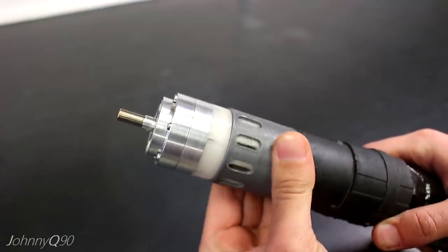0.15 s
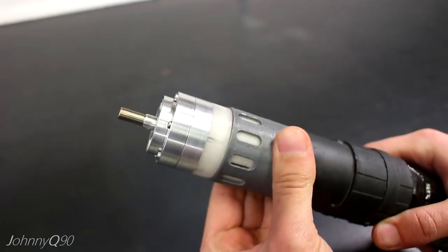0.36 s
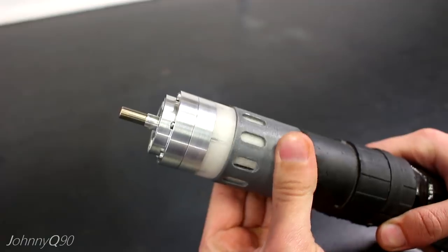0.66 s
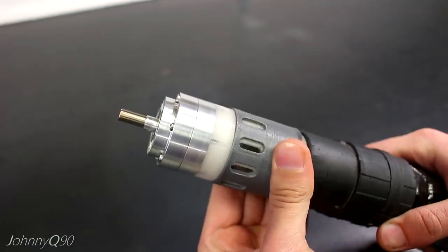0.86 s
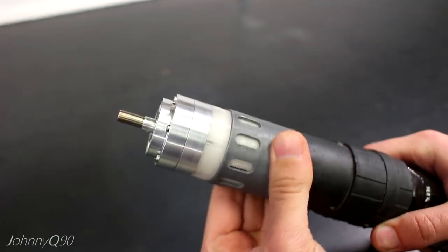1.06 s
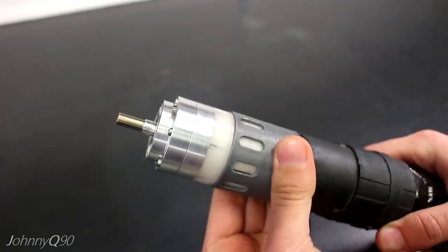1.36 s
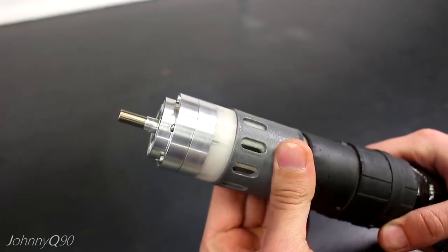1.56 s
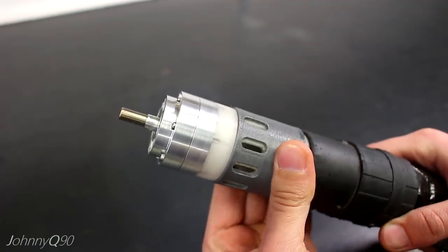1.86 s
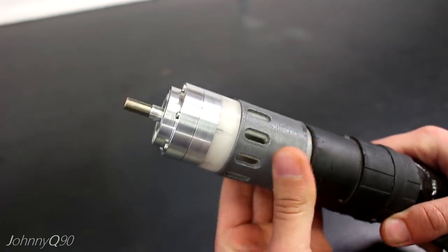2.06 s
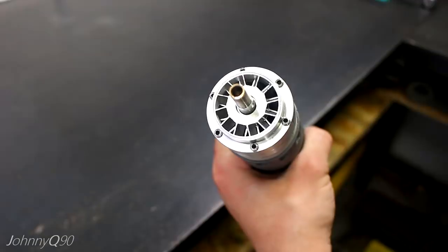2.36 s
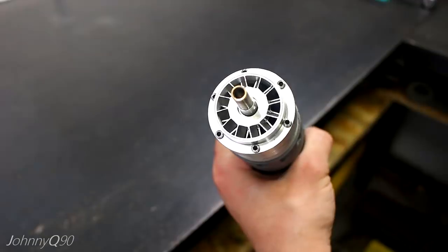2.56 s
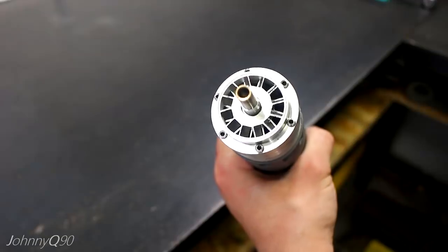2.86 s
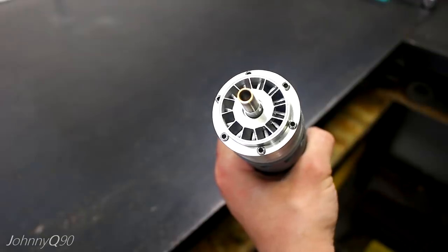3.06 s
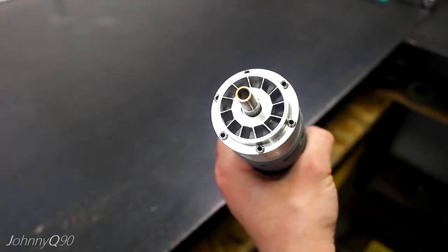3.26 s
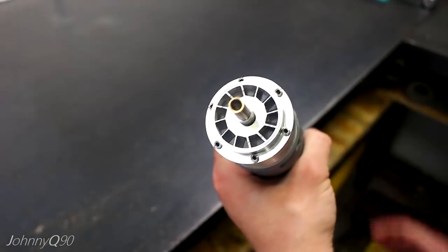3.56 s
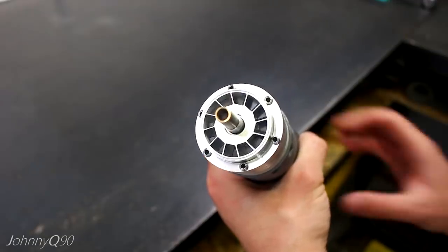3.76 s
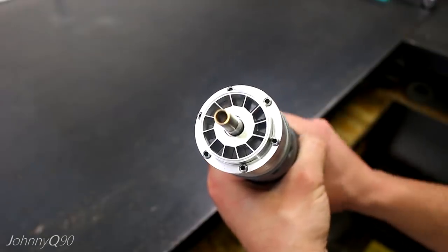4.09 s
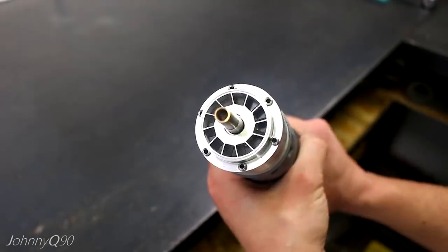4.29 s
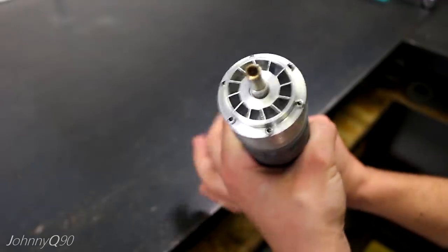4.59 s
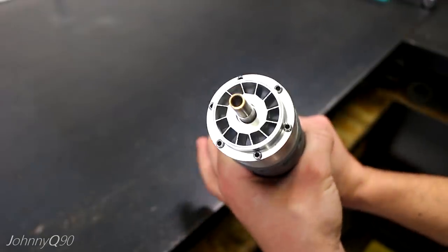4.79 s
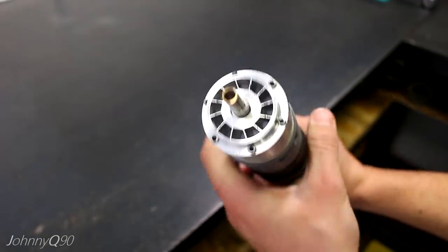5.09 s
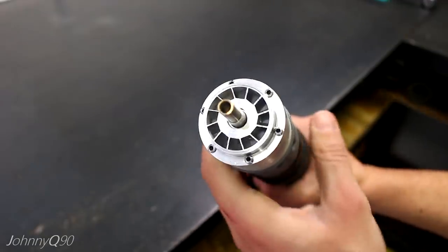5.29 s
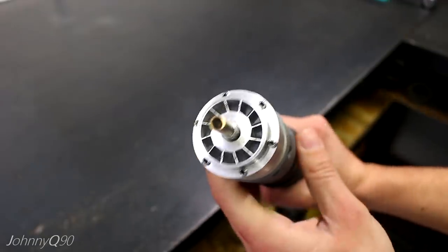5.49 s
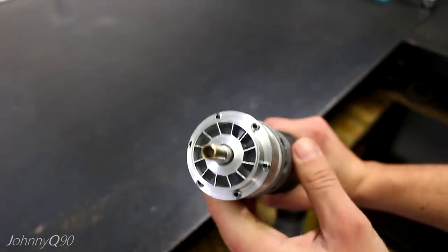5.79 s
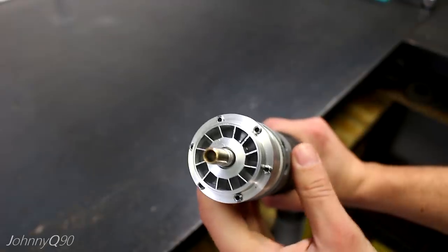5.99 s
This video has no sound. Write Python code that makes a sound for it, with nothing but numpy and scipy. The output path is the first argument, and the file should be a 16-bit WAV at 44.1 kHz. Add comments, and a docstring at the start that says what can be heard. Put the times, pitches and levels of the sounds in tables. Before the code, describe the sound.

Two shrill turbine swells with roaring vent air, an abrupt hush, one plastic click, then a vacuum motor winding up to a steady drone.

```python
"""Air turbine on a vacuum hose

A hand-held turbine: a thumb turns the vent ring and the rotor whines up and down twice, as blade-pass tones,
while noise peaked at the vent resonance roars over the drone of the running vacuum. A hard cut to the quiet
workshop: filtered impulses click a switch, and the vacuum's fan motor runs up to its steady drone, with tones
locked to its shaft over resonant air noise. One microphone."""
import sys
import numpy as np
from scipy import signal
from scipy.fft import rfft, irfft, next_fast_len
from scipy.io import wavfile
from scipy.ndimage import uniform_filter1d, map_coordinates

SR = 44100
rng = np.random.default_rng(int(sys.argv[2]) if len(sys.argv) > 2 else 0)


def waveform_to_disk(signal):
    """Save audio, clipped to [-1, 1], as 16-bit WAV at the path in sys.argv[1]."""
    frames = np.transpose(np.atleast_2d(signal))
    scaled = np.clip(frames, -1, 1) * 32767
    samples = np.round(scaled).astype(np.int16)
    wavfile.write(sys.argv[1], SR, samples)


def linear_from_db(decibels):
    """Turn decibels (scalar or array-like) into linear amplitude factors; 0 gives 1."""
    return 10 ** (np.asarray(decibels, float) / 20)


N = 270774
TIME = np.arange(N) / SR
CUT_S = 2.389  # hard cut from the turbine to the workshop


def unit(x):
    """Scaled to rms 1."""
    return x / np.sqrt(np.mean(x ** 2) + 1e-20)


def along(points, hz):
    """Reads (frequency [Hz], value) points on a log frequency axis."""
    point_hz, value = np.transpose(points)
    return np.interp(np.log(hz + 1), np.log(point_hz + 1), value)


def curves(rows):
    """One value per sample for each column after the time."""
    s, *columns = np.transpose(rows)
    return [np.interp(TIME, s, column) for column in columns]


def wobble(rate):
    """A smooth random curve, rate knots a second."""
    knots = rng.standard_normal(int(N * rate / SR) + 4)
    return map_coordinates(knots, [TIME * rate])


def filtered(x, response):
    """x times a complex response of frequency."""
    size = next_fast_len(N + SR // 2)
    hz = np.fft.rfftfreq(size, 1 / SR)
    return irfft(rfft(x, size) * response(hz), size)[:N]


def modes(rows):
    """Causal response of resonances, listed as (frequency [Hz], width [Hz], level [dB]), alternating in sign."""
    def response(hz):
        total = 0
        for k, (centre, width, db) in enumerate(rows):
            damping = 1j * hz * width
            total = total + (-1) ** k * linear_from_db(db) * damping / (centre * centre - hz * hz + damping)
        return total
    return response


def rush(gain, patchy_db):
    """Rms-1 noise with patches of random gain, coloured by gain(hz, s) of frequency and time."""
    hz, s, z = signal.stft(rng.standard_normal(N), SR, nperseg=512)
    patches = uniform_filter1d(rng.standard_normal(z.shape), size=5, axis=0)
    patches = uniform_filter1d(patches, size=2, axis=1)
    z = z * linear_from_db(patchy_db * unit(patches)) * gain(hz[:, None], s)
    return unit(signal.istft(z, nperseg=512)[1][:N])


def tone(turns, rough, rate):
    """A sine of rms 1 whose size and phase are shaken by turbulence."""
    shake = 1 + rough * (wobble(rate) + 1j * wobble(rate))
    return unit((shake * np.exp(2j * np.pi * turns)).real)


# the rotor's glides, before inertia and body: (time [s], blade-pass frequency [Hz], whine level [dB])
ROTOR_GLIDES = [(.1, 180.2, -33.5), (.2, 440, -35), (.28, 854, -40.5), (.33, 1300, -41), (.38, 1733, -40.5),
                (0.421, 2050, -31.5), (.46, 2300, -30.5), (.5, 2485, -31), (.545, 2620, -29),
                (.62, 2995, -28), (.7, 3254, -25.5), (.75, 3403, -28), (0.781, 3307, -30),
                (.82, 3010, -35.5), (.87, 2553, -32.5), (.93, 1952, -38), (1, 1508, -33.5),
                (1.08, 1254, -39.5), (1.139, 1481, -37), (1.23, 2360, -32), (1.28, 2602, -29.5),
                (1.42, 2596, -28.5), (1.46, 2900, -27), (1.505, 2950, -25.5), (1.57, 2640, -29),
                (1.63, 2218, -26.5), (1.69, 1863, -31), (1.77, 1605, -30), (1.9, 1246, -37),
                (2.1, 850, -49)]
# blade-pass multiples 1 to 4: (offset from the whine level [dB])
WHINE_MULTIPLES = [0.5, -4.5, -11.5, -12.5]
# the whine's overtones over their usual level: (time [s], level [dB])
OVERTONE_SWELLS = [(.2, 4), (.33, 5.5), (.38, 7.5), (.42, -0.5), (.46, -1), (.6, 1.5), (.74, -1),
                   (.82, 1.5), (.88, -9), (1.0, -5), (1.1, -1), (1.2, 1.5), (1.36, 0.5), (1.5, -2.5),
                   (1.56, -10), (1.63, -11), (1.7, -8), (1.8, -8), (1.9, -3.5)]
# how well the tool body radiates each pitch: (frequency [Hz], level [dB])
TOOL_BODY = [(200, -19), (900, -21), (1350, -8.5), (1780, -13), (2030, -6), (2300, 1.5), (3100, -3.5),
             (3270, 7), (3400, 3.5), (3600, 4), (4100, -1.5), (4600, 6.5), (5100, -0.5), (5850, 1.5),
             (6700, -6.5), (7800, -2.5), (9000, -3), (10400, -6), (13500, -12)]
# unequal blades put side tones at whole shaft orders:
# (blade-pass multiple [count], offset [shaft orders], level relative to the multiple [dB])
SIDE_TONES = [(1, -1, -22), (1, 1, -21), (2, -1, -15), (2, 1, -17), (2, 2, -26), (3, -2, -11), (3, -1, -6),
              (3, 1, -10), (4, -2, -8), (4, 1, -12), (4, 4, -12), (4, 9, -10), (4, 12, -8)]


def rotor():
    """Blades chop the air into a whine with shaft-order side tones; its echo trails behind every glide."""
    blades = 12
    blade_hz, whine_db = curves(ROTOR_GLIDES)
    blade_hz = uniform_filter1d(blade_hz, size=1500)  # the rotor's inertia rounds every change of speed
    blade_hz = blade_hz * (1 + .002 * wobble(18))  # the speed wavers slightly
    shaft_turns = np.cumsum(blade_hz) / (SR * blades)
    overtone_db, = curves(OVERTONE_SWELLS)

    level_db = []
    for k, db in enumerate(WHINE_MULTIPLES, 1):
        multiple_db = whine_db + db + along(TOOL_BODY, k * blade_hz)
        if k > 1:
            multiple_db = multiple_db + overtone_db + 1.3 * wobble(22)
        level_db.append(multiple_db)

    whine = np.zeros(N)
    for k, (db, rough) in enumerate(zip(level_db, [.07, .25, .35, .4]), 1):
        whine += linear_from_db(db + 0.59 * wobble(30)) * tone(k * blades * shaft_turns, rough, rate=110)
    for k, offset, db in SIDE_TONES:
        order = k * blades + offset
        audible = order * blade_hz / blades < SR / 2  # nothing above half the sample rate
        whine += audible * linear_from_db(level_db[k - 1] + db) * tone(order * shaft_turns, 0.57, rate=46)
    whine *= np.interp(TIME, [.1, .13, 2.0, 2.15], [0, 1, 1, 0])
    return whine + linear_from_db(-14) * workshop(whine, delay=.004)


# the thumb on the vent ring: (time [s], opening [0-1])
VENT_RING = [(.14, 1), (.26, 0.22), (.32, .04), (.38, 0.01), (.74, 0.01), (.8, 0.05), (.86, 0.3),
             (.98, .83), (1.05, 0.73), (1.1, .2), (1.16, 0), (1.22, 0.03), (1.46, 0.02), (1.54, 0.06),
             (1.64, 0.39), (1.78, 0.5), (1.95, 0.97), (2.4, 0.86)]


def vent_roar():
    """Air roars lumpily through the vent slots, peaked at their cavity resonance."""
    shut_hz, open_hz = 2500, 1745  # vent resonance
    open_db, leak_db = -34, -23.5  # open slots; leak through shut slots, relative to that
    full_at = .15  # scale of the opening at which the roar saturates
    air_on_s, air_rise_s, air_before_db = 0.095, 0.044, -13.5  # air starts through the tool
    opening = np.clip(curves(VENT_RING)[0], 0, 1)
    centre_hz = shut_hz + (open_hz - shut_hz) * opening

    def cavity(hz, s):
        centre = np.interp(s, TIME, centre_hz)
        u = (hz + 1) / centre
        resonance = u ** 0.23 / np.abs(1 - u * u + .55j * u) * np.minimum(u, 1) ** 0.96
        # closing slots raise the resonance and add a narrow whistle on top
        closing = np.clip(centre / 1850 - 1, 0, 1)
        whistle = 1.5 * closing / (0.33 + (hz / 2350 - 1) ** 2 / 0.0072)
        return (1 + whistle) * resonance

    start_db = air_before_db * np.clip(1 - (TIME - air_on_s) / air_rise_s, 0, 1)
    flow_db = 20 * np.log10(linear_from_db(leak_db) + np.tanh(opening / full_at))
    lumps_db = 0.85 * wobble(120) + 1.6 * wobble(17)
    return rush(cavity, patchy_db=-1.0) * linear_from_db(open_db + start_db + flow_db + lumps_db)


# colour of the blade-tip hiss, before speed brightens it: (frequency [Hz], relative density [dB])
HISS_COLOUR = [(1500, -32), (3000, -9.5), (5000, 4), (7000, -4.5), (9000, -2), (10500, -7.5),
               (13000, -11.5), (15700, -14)]


def blade_hiss():
    """Blade tips tear the air into hiss, brighter and louder with speed, weaker as open vents bypass them."""
    shut_db, open_loss_db = -40.5, -11.5  # slots shut; loss when the air bypasses the blades
    fade_s, fade_db_per_s = 2, -37  # the rotor coasts to rest
    opening = np.clip(curves(VENT_RING)[0], 0, 1)
    speed = curves(ROTOR_GLIDES)[0] / 2500

    def colour(hz, s):
        brightness = 0.39 * np.interp(s, TIME, speed)
        return linear_from_db(along(HISS_COLOUR, hz)) * (hz / 6000 + .2) ** brightness

    level_db = shut_db + open_loss_db * opening + fade_db_per_s * np.maximum(TIME - fade_s, 0)
    level_db = level_db + 0.15 * 20 * np.log10(speed) + .6 * wobble(20)
    return rush(colour, patchy_db=1.5) * linear_from_db(level_db)


# speed still to gain, a quick and a slow part: (shaft speed [Hz], time constant [s])
RUN_UP = [(401, .182), (80, .35)]


def fan_speed():
    """The shaft turns steadily while warm; after the switch it nears full speed in two exponentials."""
    full_hz, warm_hz, switch_on_s = 601.4, 603, 2.985
    before_cut = TIME < CUT_S + .1  # the extra time covers the crossfade
    since = np.maximum(TIME - switch_on_s, 0)
    missing_hz = sum(hz * np.exp(-since / s) for hz, s in RUN_UP)
    shaft_hz = np.where(before_cut, warm_hz, full_hz - missing_hz)
    speed_db = 20 * np.log10(shaft_hz / full_hz)
    return before_cut, shaft_hz, speed_db


# tones ring through casing and room unevenly on the way up:
# (shaft speed [Hz], shaft tone [dB], fan-blade tone [dB], second blade multiple [dB])
RUN_UP_TONES = [(120, -80, -78, -88), (191, -86, -56, -87.5), (260, -80.5, -75, -89), (332, -61, -54, -82),
                (372, -61, -64, -78), (402, -71, -56, -74), (440, -58, -67, -64), (478, -49, -61, -66),
                (536, -51, -54, -64), (575, -57, -53, -60), (579, -57, -49, -53), (591.5, -46.5, -54, -56),
                (595.5, -47.5, -50, -65), (599, -47.5, -51, -66)]
# the warm vacuum before the cut: (drone, shaft tone, fan-blade tone, second blade multiple), each a level [dB]
WARM_LEVELS = (-45, -56, -50, -63)
# weak shaft orders: (shaft order [count], level at full speed [dB], growth with speed [dB per dB])
WEAK_ORDERS = [(6, -64, 1.5), (12, -72, .4), (21, -78, 2.5)]
# vacuum casing modes that ring on after a tone sweeps by: (frequency [Hz], width [Hz], level [dB])
CASING_MODES = [(3400, 25, 3), (4660, 33, 19)]


def fan_tones(before_cut, shaft_hz, speed_db):
    """Shaft and blades sound at whole shaft orders, ragged while the fan speeds up, and ring the casing."""
    fan_blades = 7
    turns = np.cumsum(shaft_hz + .3 * wobble(3)) / SR
    speed_hz, *run_db = np.transpose(RUN_UP_TONES)
    shaft_db, blade_db, second_db = [np.where(before_cut, warm, np.interp(shaft_hz, speed_hz, db))
                                     for warm, db in zip(WARM_LEVELS[1:], run_db)]
    ragged = np.clip(-speed_db / 3, 0, 1)
    tones = linear_from_db(shaft_db + .8 * wobble(2.5)) * tone(turns, 0.052 + .2 * ragged, rate=25)
    tones += linear_from_db(blade_db + 1.2 * wobble(4)) * tone(fan_blades * turns, .2 + 1.3 * ragged, rate=90)
    tones += linear_from_db(second_db) * tone(2 * fan_blades * turns, .4 + .8 * ragged, rate=60)
    for order, db, growth in WEAK_ORDERS:
        tones += linear_from_db(db + growth * speed_db) * tone(round(order) * turns, 0.37, rate=30)
    return tones + filtered(tones, modes(CASING_MODES)) + linear_from_db(-24) * workshop(tones, delay=.004)


# colour of the air drone: (frequency [Hz], relative density [dB])
DRONE_COLOUR = [(15, -67.5), (25, -34), (276, -21.5), (371, -13.5), (461, -9.5), (557, -11.5), (604, -11.5),
                (672, -11), (2200, -9), (3130, -16.5), (4100, -18.5), (4450, -17.5), (6850, -17.5),
                (12400, -33.5), (15800, -39.5)]
# hose and casing resonances: (frequency [Hz], width [Hz], boost [dB])
HOSE_RESONANCES = [(140.6, 34, 11), (279, 75, 10.5), (362, 24, -6.5), (461, 150, 1), (810, 17, 2.5),
                   (1003, 20, 6), (1358, 35, 4), (1800, 26.1, 0.5), (2267, 60, 3), (2440, 40, 4),
                   (2640, 35, 5), (2863, 40, 5.5), (3090, 202, -3), (3445, 49, 8), (3610, 63, 3),
                   (3994, 130, 8.5), (4750, 54, 5), (5600, 44, 8), (6580, 110, 4.5)]


def air_drone(before_cut, speed_db):
    """Air rushes through resonant hose and casing, quieter and duller while the fan is slow."""
    full_db, growth = -40, 1.35  # level at full speed after the run-up; dB per dB of speed
    open_db = 2.5  # more drone escapes through open slots

    def dull(hz, s):
        index = np.minimum(s * SR, N - 1).astype(int)
        return linear_from_db(0.7 * speed_db[index] * np.log2(1 + hz / 4000))

    def colour(hz):
        boost_db = sum(db / (1 + (2 * (hz - centre) / width) ** 2) for centre, width, db in HOSE_RESONANCES)
        return linear_from_db(along(DRONE_COLOUR, hz) + boost_db)

    level_db = np.where(before_cut, WARM_LEVELS[0], full_db + growth * speed_db)
    level_db = level_db + before_cut * open_db * curves(VENT_RING)[0]
    air = unit(filtered(rush(dull, patchy_db=1), colour))
    return air * linear_from_db(level_db + 0.3 * wobble(4.8))


# swell of the low hum: (time [s], level [dB])
HUM_SWELL = [(3.3, -89), (3.65, -59), (4, -64), (5, -66), (6.14, -71)]


def low_hum():
    """A low hum, likely the idling rotor's shaft, glides up and settles exponentially."""
    start_hz, settled_hz, start_s, settle_s = 100, 169, 3.3, .46
    since = np.maximum(TIME - start_s, 0)
    hum_hz = settled_hz - (settled_hz - start_hz) * np.exp(-since / settle_s)
    return linear_from_db(curves(HUM_SWELL)[0]) * tone(np.cumsum(hum_hz) / SR, 0.43, rate=11)


def vacuum():
    """One fan speed drives the shaft and blade tones and the air drone; the low hum joins in."""
    before_cut, shaft_hz, speed_db = fan_speed()
    return fan_tones(before_cut, shaft_hz, speed_db) + low_hum() + air_drone(before_cut, speed_db)


# switch lead-in and snap, before the rocker's filter: (time [s], relative level [dB])
SWITCH_SNAPS = [(2.98598, -32), (2.98624, -18)]
# plastic rocker: (frequency [Hz], width [Hz], level [dB])
ROCKER_MODES = [(3800, 1800, -7), (6830, 1100, 0), (8840, 1500, -2), (13500, 2500, -12.5)]


def switch():
    """The rocker snaps over: impulses ring its plastic and the workshop answers with a short bright tail."""
    snap = np.zeros(N)
    for s, db in SWITCH_SNAPS:
        snap[round(s * SR)] = linear_from_db(db + 14.5)
    click = filtered(snap, modes(ROCKER_MODES))
    return click + linear_from_db(-2.5) * workshop(click, delay=0.0006)


# the workshop's decay: (frequency [Hz], time to fall 60 dB [s])
WORKSHOP_DECAY = [(500, 0.28), (4000, 0.19), (7000, 0.21), (14000, 0.06)]


def workshop(x, delay):
    """The room's answer, delayed by some seconds: noise in which each frequency dies at its own speed."""
    hz, s, z = signal.stft(rng.standard_normal(SR // 2), SR, nperseg=128)
    decay = linear_from_db(-60 * s / along(WORKSHOP_DECAY, hz)[:, None])
    tail = signal.istft(z * decay, SR, nperseg=128)[1]
    delayed = np.pad(x, (round(delay * SR), 0))
    return signal.fftconvolve(delayed, tail / np.linalg.norm(tail))[:N]


# colour of the still room: (frequency [Hz], relative density [dB])
ROOM_COLOUR = [(15, -57.5), (25, -28), (48, -6), (65, -2.5), (113, -8), (587, -17), (1590, -26.5),
               (8000, -33.5), (11000, -37), (15800, -53)]


def room_tone():
    """The still room: steady coloured noise whose level wavers."""
    noise = filtered(rng.standard_normal(N), lambda hz: linear_from_db(along(ROOM_COLOUR, hz)))
    return linear_from_db(-78 + 2.2 * wobble(15)) * unit(noise)


def scene():
    """The turbine on the running vacuum until the cut, then the still room, the switch and the run-up."""
    before_cut = np.clip((CUT_S - TIME) / 0.0045 + .5, 0, 1)
    switched_on = np.clip((TIME - SWITCH_SNAPS[0][0]) / 0.0072, 0, 1)
    turbine = rotor() + vent_roar() + blade_hiss()
    mono = before_cut * turbine + (before_cut + switched_on) * vacuum() + switch() + room_tone()
    return np.array([mono, mono])


def top_cut(x):
    """Nothing passes above the cut-off."""
    return signal.sosfilt(signal.butter(12, 16570, fs=SR, output="sos"), x)


# the microphone's colour: (frequency [Hz], level [dB])
MICROPHONE_COLOUR = [(20, -0.5), (7500, 0), (8800, 0), (10300, -3), (12400, 3), (14000, 1.5), (15700, -4.5)]


def record(dry):
    """A mono microphone on both channels colours the sound and ends sharply at its top frequency."""
    top_hz = 15740

    def microphone(hz):
        return linear_from_db(along(MICROPHONE_COLOUR, hz)) * (hz < top_hz)

    mix = np.array([filtered(side, microphone) for side in dry])
    return top_cut(mix)


dry = scene()
out = record(dry)
waveform_to_disk(out)
```